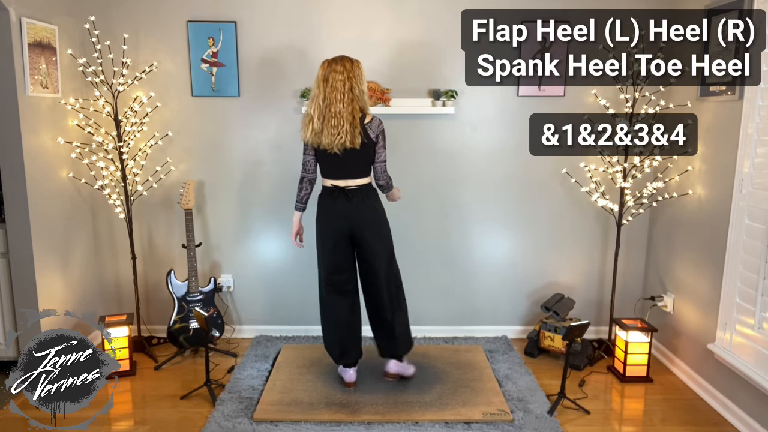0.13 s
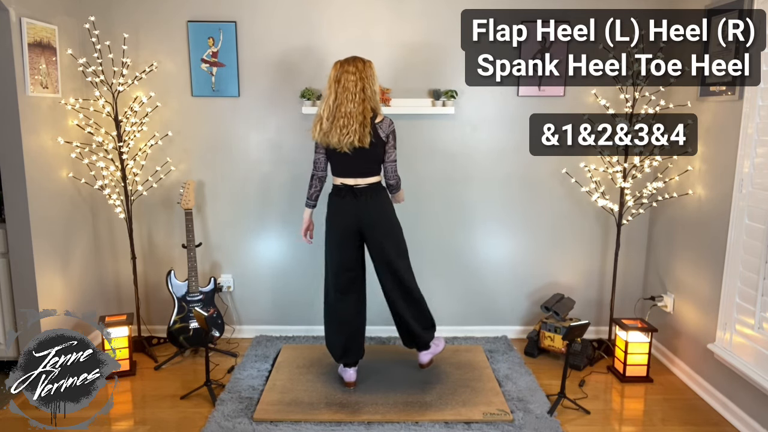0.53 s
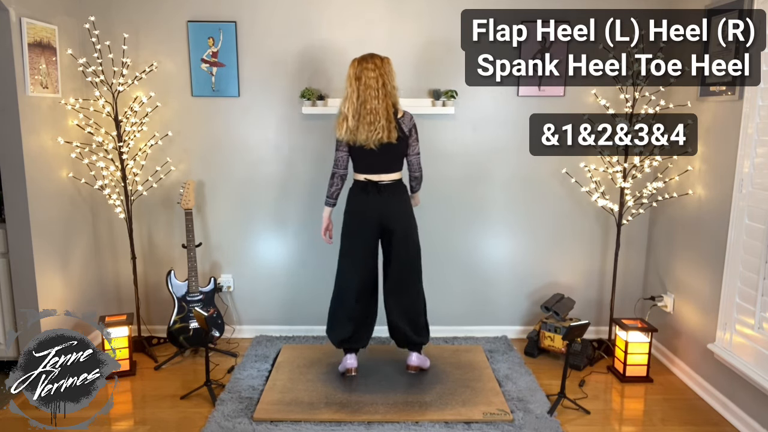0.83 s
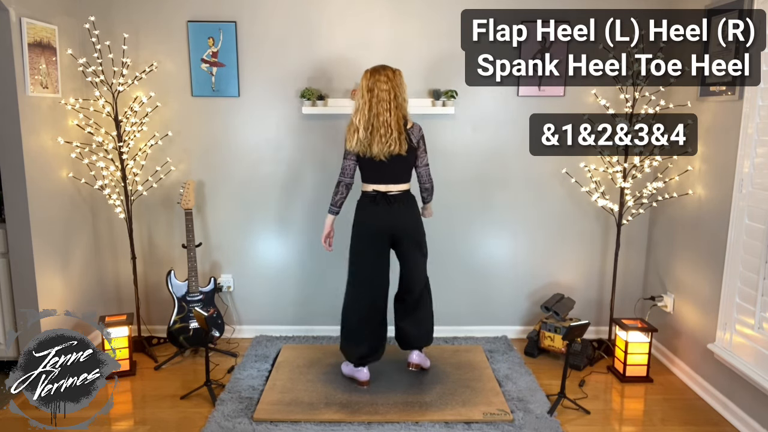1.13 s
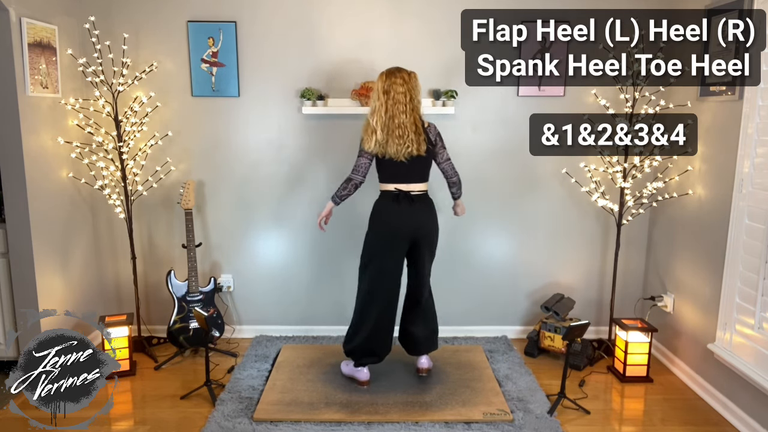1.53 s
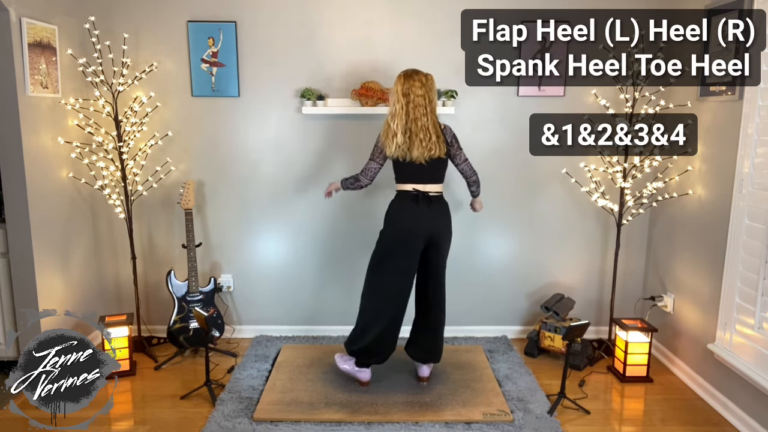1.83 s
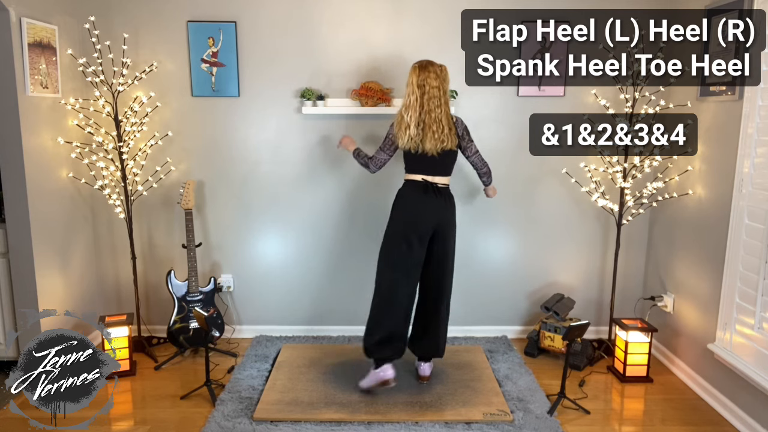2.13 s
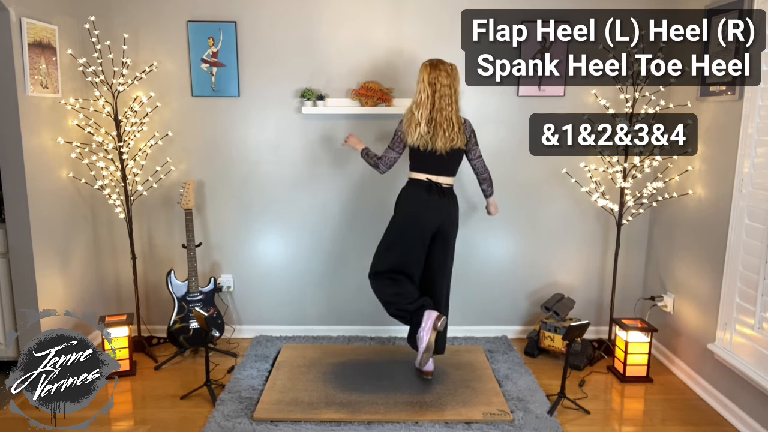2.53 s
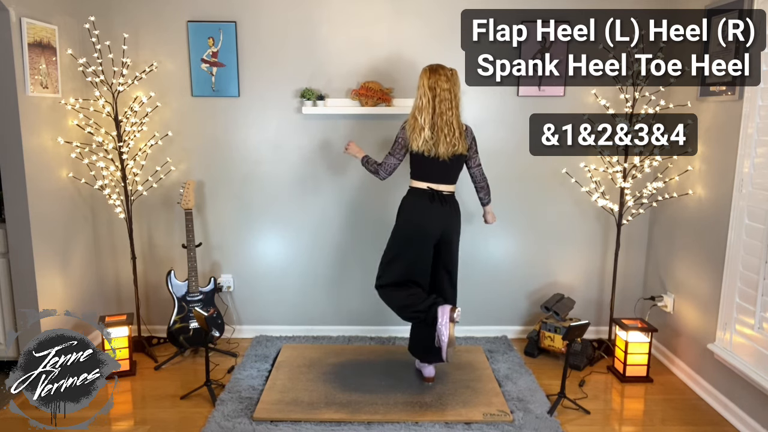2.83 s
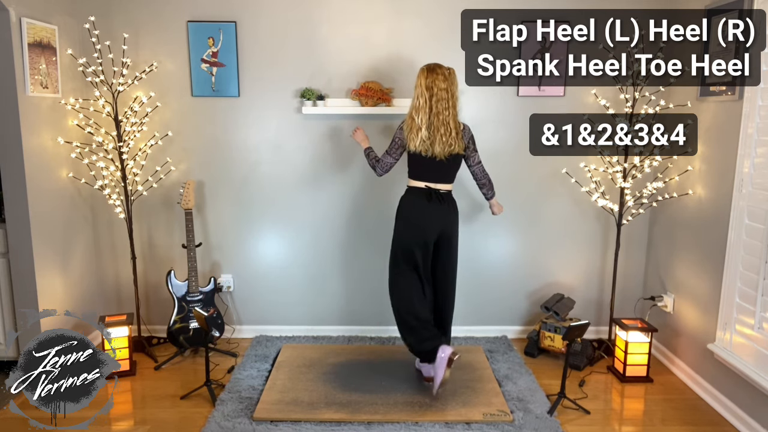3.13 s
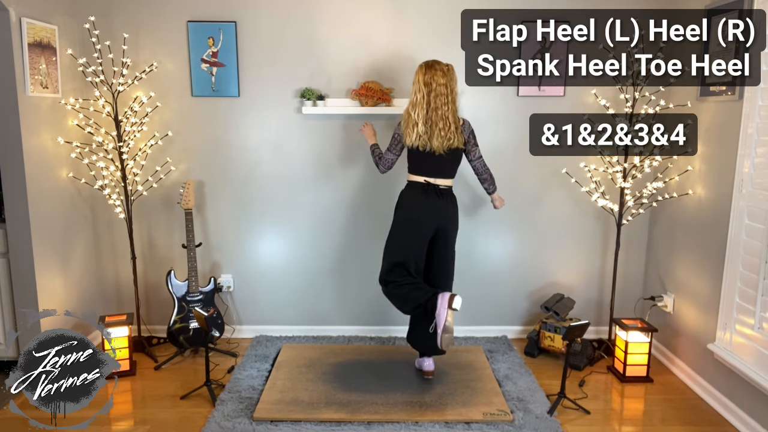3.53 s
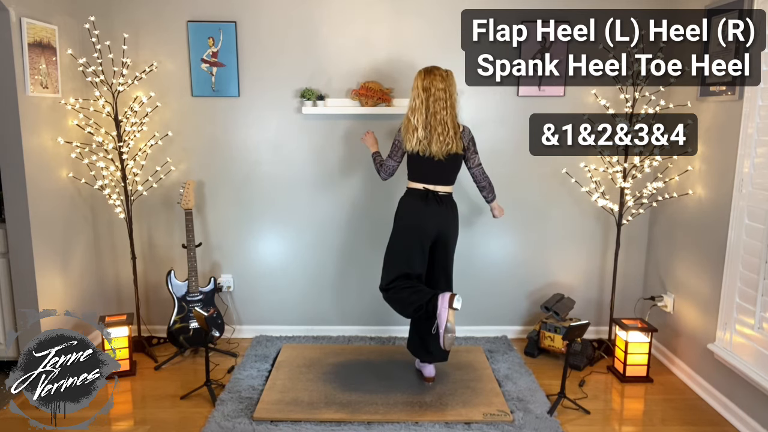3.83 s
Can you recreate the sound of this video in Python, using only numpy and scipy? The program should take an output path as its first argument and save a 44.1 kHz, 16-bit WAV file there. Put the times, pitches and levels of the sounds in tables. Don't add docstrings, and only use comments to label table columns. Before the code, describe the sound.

Slow, even tap dance: a brush and slap, two boomy heel knocks, a bright spank, a heel, a hard toe knock and a final heel, each ringing briefly in a live small room over faint hum and hiss.

```python
import sys
import numpy as np
from scipy import signal
from scipy.fft import rfft, irfft
from scipy.io import wavfile
from scipy.ndimage import uniform_filter1d

SR = 44100
rng = np.random.default_rng(int(sys.argv[2]) if len(sys.argv) > 2 else 0)


def to_linear_factor(level_db):
    exponent = np.asarray(level_db, float) / 20
    return 10 ** exponent


def master_out(mix):
    frames = np.transpose(np.atleast_2d(mix))
    ceiling = np.clip(frames, -1, 1)
    pcm = np.round(ceiling * 32767).astype(np.int16)
    wavfile.write(sys.argv[1], SR, pcm)


N = 176400

# (time [s], blow level [dB], tap plate pitch [Hz], plate level [dB], floor boom level [dB])
STEPS = [
    (0.0698, -2, 1760, 2.5, -17),
    (0.5818, 0, 1740, 0.5, -20.5),
    (1.0610, -2.5, 290, 1.5, -7.5),
    (1.5541, -3, 1092, -2, -5.5),
    (2.0542, 2, 2178, 4.5, -21.5),
    (2.5377, -4.5, 1140, 8, -5.5),
    (3.0355, 6, 250, -13, -16),
    (3.5358, -0.5, 1140, 5, -7),
]
# (frequency [Hz], level per Hz [dB])
BRUSH = [(60, -28), (130, -15), (450, -3), (1750, -5.5), (2900, -11.5), (4500, -23), (9000, -35.5),
         (15000, -44.5)]
SLAP = [(60, -21.5), (140, -12), (600, -5), (1600, -3), (2300, -7), (5500, -13.5), (9000, -25),
        (15000, -34.5)]
NEAR_HEEL = [(60, 4), (110, 1.5), (600, -4), (1600, -11), (2300, -18.5), (4000, -25), (9000, -32),
             (15000, -47.5)]
FAR_HEEL = [(70, -4), (500, -14.5), (1100, -13), (1900, -22), (2300, -32), (7000, -33), (10500, -47),
            (14000, -50)]
SPANK = [(60, -41), (140, -14), (770, -2), (2100, -2.5), (3300, -7.5), (5500, -17), (9500, -28),
         (15000, -39)]
BACK_HEEL = [(70, -2.5), (400, -5.5), (1950, -15), (2500, -28.5), (4000, -29), (4900, -24.5), (6500, -32),
             (15000, -50)]
TOE = [(60, -21), (200, -6), (500, -5), (1300, -7.5), (2200, -18), (4000, -27.5), (4900, -37),
       (15000, -64.5)]
LAST_HEEL = [(70, 8), (450, -3.5), (1300, -3), (2000, -19), (7500, -24.5), (10500, -35.5), (13000, -40),
             (15000, -43)]
# (frequency [Hz], level over the contact colour [dB], time to fall 60 dB [s])
BOARD_MODES = [(250, 2.5, 0.013), (453, 1, 0.013), (574, 4.5, 0.12), (1015, -1, 0.12), (1086, 4, 0.05),
               (1316, -1, .04), (1760, 1.5, 0.017), (2260, -5, .03), (2786, -1.5, 0.0067)]
# (frequency [Hz], level over the contact colour [dB], time to fall 60 dB [s])
METAL_MODES = [(3360, -0.5, .004), (5000, -3.5, .004), (6900, -3, 0.0019), (9000, 1, 0.0019),
               (13500, -3, .002)]
# (frequency [Hz], level [dB], time to fall 60 dB [s])
BOOM_MODES = [(57.18, -14.5, 0.84), (88, -14.5, .15), (107, 5, 0.13), (104, -9.5, 0.85), (133.2, 8.5, 0.29),
              (205, -3, 0.11)]
# (frequency [Hz], level [dB], time to fall 60 dB [s])
KNOCKS = [(447, -2, .12), (406, -13.5, .1), (290, -30, 0.11), (243, -15, .1), (420, -17.5, .1),
          (365, -7, 0.12), (472, -5, 0.16), (416, -8.5, .1)]
# (frequency [Hz], level [dB], time to fall 60 dB [s])
PINGS = [(1750, -6.5, .035), (1740, -4, .05), (960, -11, 0.028), (1060, 2, 0.07), (2072, -3.5, 0.051),
         (1730, -8, .03), (1128, -5.5, 0.13), (1140, -5.5, 0.093)]
# (frequency [Hz], level [dB])
DIRECT = [(80, -2.5), (400, -1.5), (1500, 5.5), (5000, 6.5), (14000, 8)]
# (delay [s], level [dB])
ECHOES = [(.0013, -7.5), (.0033, -5), (.0057, -2.5), (.0068, -3.5), (0.0094, -15.5), (0.012, -16.5),
          (0.021, -13)]
# (frequency [Hz], time to fall 60 dB [s])
ROOM_DECAY = [(60, 0.3), (160, 0.57), (420, 0.62), (1100, 0.65), (2000, 0.59), (2900, .5), (7700, 0.47),
              (15000, 0.23)]
# (frequency [Hz], level per Hz [dB])
AIR_COLOUR = [(20, -8.5), (40, -13.5), (56, -9), (72, -21), (106, -17.5), (300, -24), (3000, -40.5),
              (13000, -60.5)]
# (time [s], level [dB])
SCUFFS = [
    (.025, -74),
    (1.498, -66.5),
    (1.968, -69.5),
]

PLATE_T60_S, SPREAD_S, BOOM_RISE_S = 0.016, 0.00059, 0.0041
CONTACT_S, CHATTER = 0.00075, 0.49
ROOM_DB, ROOM_RISE_S, QUICK_DB, QUICK_T60_S = 11, 0.0035, 1.5, 0.14
MODES_BELOW_HZ = 110
AIR_DB, HUM_HZ, HUM_DB, HUM_WAVER_DB = -68.5, 56, -60, 2
HUM_DIP_DB, HUM_BACK_S = -16, 0.075
LOW_CUT_HZ, EDGE_HZ = 22, 15750
DUCK_FROM_DB, DUCK_SHARE, RECOVER_DB_PER_S, CEILING = -22, 0.17, 45.5, 1.01


def read(points, hz):
    f, value = np.transpose(points)
    return np.interp(np.log(hz + 1), np.log(f + 1), value)


def unit(x):
    return x / np.sqrt(np.sum(x ** 2) + 1e-20)


def click(colour, modes=(), spread_s=0):
    hz = np.abs(np.fft.fftfreq(4096, 1 / SR))
    peaks = 1
    for f, db, t60 in modes:
        peaks = peaks + to_linear_factor(db) ** 2 / (1 + ((hz - f) * t60 / 0.61) ** 2)
    log_gain = np.log(to_linear_factor(np.maximum(read(colour, hz), -100)) * np.sqrt(peaks))
    lag = np.cumsum(spread_s / np.sqrt(1 + hz[:2049] / 500)) * SR / 4096
    log_spectrum = np.conj(signal.hilbert(log_gain))[:2049] - 2j * np.pi * lag
    return irfft(np.exp(log_spectrum))[:2048]


def ring(modes, length):
    t = np.arange(round(length * SR)) / SR
    hz, db, t60 = np.transpose(modes)[:, :, None]
    sines = to_linear_factor(db - 60 * t / t60) * np.sin(2 * np.pi * hz * t)
    return unit(sines.sum(0))


def air():
    hz, t = np.fft.rfftfreq(N, 1 / SR), np.arange(N) / SR
    hiss = irfft(rfft(rng.standard_normal(N)) * to_linear_factor(read(AIR_COLOUR, hz)), N)
    hiss = to_linear_factor(AIR_DB) * np.sqrt(N) * unit(hiss)
    waver = irfft(rfft(rng.standard_normal(N)) * (hz < 5), N)
    waver = np.sqrt(N) * unit(waver)
    hum = to_linear_factor(HUM_DB + HUM_WAVER_DB * waver) * np.sin(2 * np.pi * HUM_HZ * t)
    dip = sum((t > s) * np.exp(-((t - s) / HUM_BACK_S) ** 2) for s, *_ in STEPS)
    return to_linear_factor(HUM_DIP_DB * dip) * (hiss + hum)


def scuffs():
    out, t = np.zeros(N), np.arange(2000) / SR
    rub = unit(click([(300, -5.5), (2500, 4), (9000, -10.5)]))
    for s, db in SCUFFS:
        grit = rng.standard_normal(2000) * t / 0.0077 * np.exp(1 - t / 0.0056)
        out[round(s * SR):][:2000] += to_linear_factor(db) * signal.fftconvolve(grit, rub)[:2000]
    return out


def room():
    t = np.arange(SR) / SR
    taps = np.zeros(SR)
    at = np.arange(40, SR - 8, 8)
    taps[at + rng.integers(0, 8, len(at))] = rng.standard_normal(len(at))
    hz, s, z = signal.stft(taps, SR, nperseg=256)
    slow = to_linear_factor(-60 * s / read(ROOM_DECAY, hz)[:, None])
    quick = to_linear_factor(QUICK_DB - 60 * s / QUICK_T60_S)
    tail = signal.istft(z * (slow + quick), SR, nperseg=256)[1][:SR]
    tail *= 1 - np.exp(-t / ROOM_RISE_S)
    tail = signal.sosfilt(signal.butter(2, MODES_BELOW_HZ, 'high', fs=SR, output='sos'), tail)
    early = np.zeros(SR)
    early[:2048] = click(DIRECT)
    for (s, db), (shift, side) in zip(ECHOES, rng.uniform(-0.41, 1, (len(ECHOES), 2))):
        early[round(s * (1 + 0.05 * shift) * SR)] += to_linear_factor(db) * np.sign(side)
    chatter = CHATTER * rng.standard_normal(300) * np.exp(-t[:300] / CONTACT_S)
    chatter[0] = 1
    return to_linear_factor(ROOM_DB) * unit(tail) + signal.fftconvolve(early, unit(chatter))[:SR]


def step(blow_db, plate_hz, plate_db, boom_db, colour, knock, ping):
    plate = (plate_hz, plate_db, PLATE_T60_S)
    blow = unit(click(colour, BOARD_MODES + METAL_MODES + [plate], SPREAD_S))
    boom = to_linear_factor(boom_db + 14.5) * ring(BOOM_MODES, 1)
    board = to_linear_factor(knock[1] + 9) * ring([knock], 1)
    low = (boom + board) * (1 - np.exp(-np.arange(SR) / SR / BOOM_RISE_S))
    near = low + to_linear_factor(ping[1]) * ring([ping], 1)
    return to_linear_factor(blow_db + 9) * (near - signal.fftconvolve(blow, room())[:SR])


def scene():
    mix = np.zeros(N + SR)
    colours = [BRUSH, SLAP, NEAR_HEEL, FAR_HEEL, SPANK, BACK_HEEL, TOE, LAST_HEEL]
    for (s, *levels), colour, knock, ping in zip(STEPS, colours, KNOCKS, PINGS):
        mix[round(s * SR):][:SR] += step(*levels, colour, knock, ping)
    return (mix[:N] + air() + scuffs())[None]


def top_cut(x):
    return signal.sosfilt(signal.butter(12, 16590, fs=SR, output="sos"), x)


def record(dry):
    dry = signal.sosfilt(signal.butter(2, LOW_CUT_HZ, 'high', fs=SR, output='sos'), dry)
    power_db = 10 * np.log10(abs(uniform_filter1d(dry[0] ** 2, 200)) + 1e-12)
    fall = np.arange(N) * RECOVER_DB_PER_S / SR
    held_db = np.maximum.accumulate(power_db + fall) - fall
    over_db = np.maximum(held_db - DUCK_FROM_DB, 0)
    ducked = dry / to_linear_factor(DUCK_SHARE * uniform_filter1d(over_db, 100))
    clipped = np.clip(ducked, -CEILING, CEILING)
    mix = signal.sosfiltfilt(signal.butter(20, EDGE_HZ, fs=SR, output='sos'), clipped)
    return top_cut(mix)


dry = scene()
out = record(dry)
master_out(out)
```